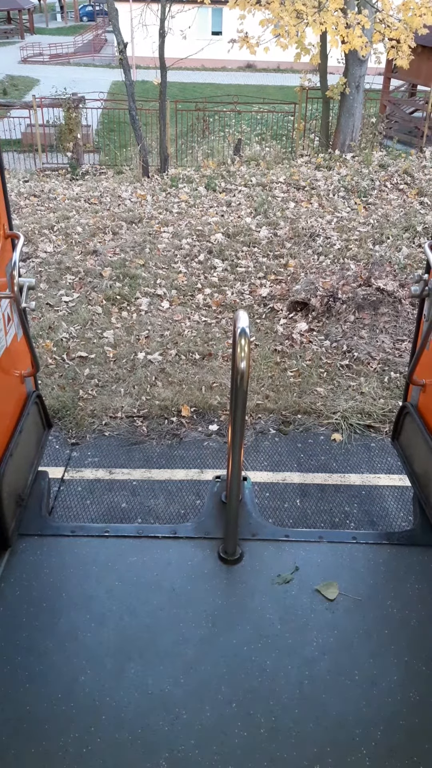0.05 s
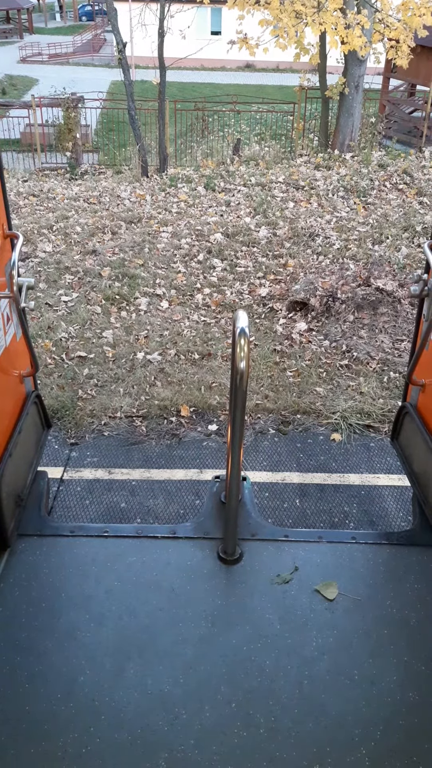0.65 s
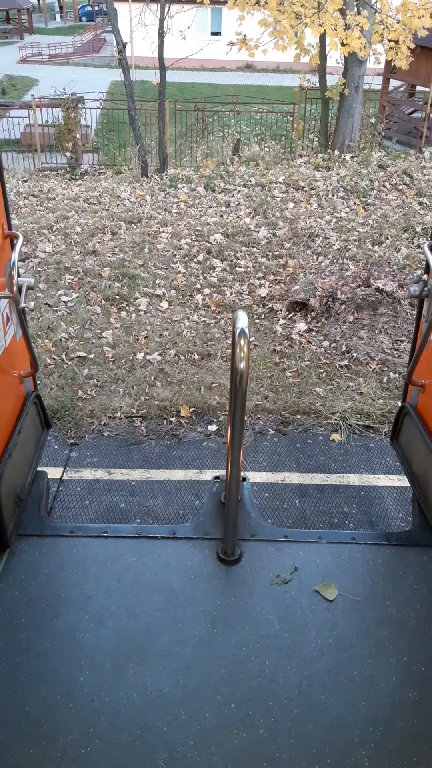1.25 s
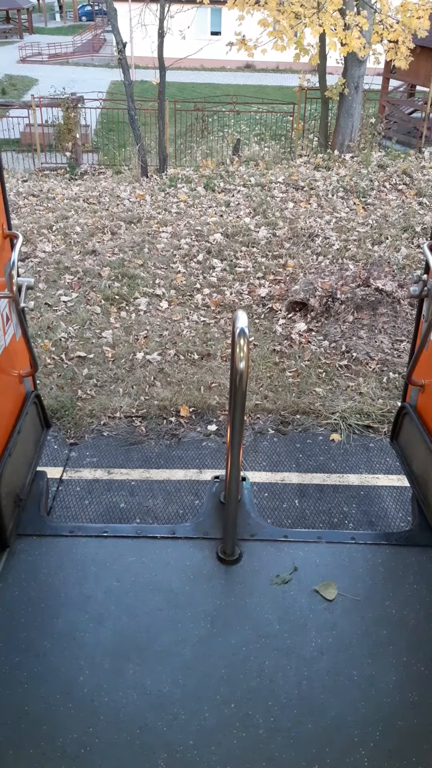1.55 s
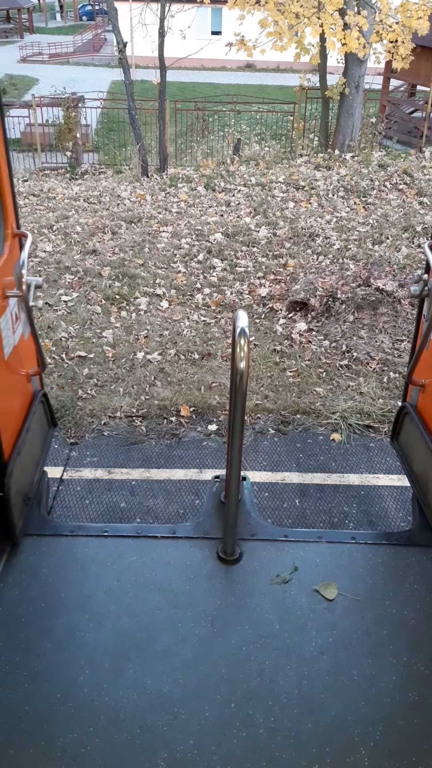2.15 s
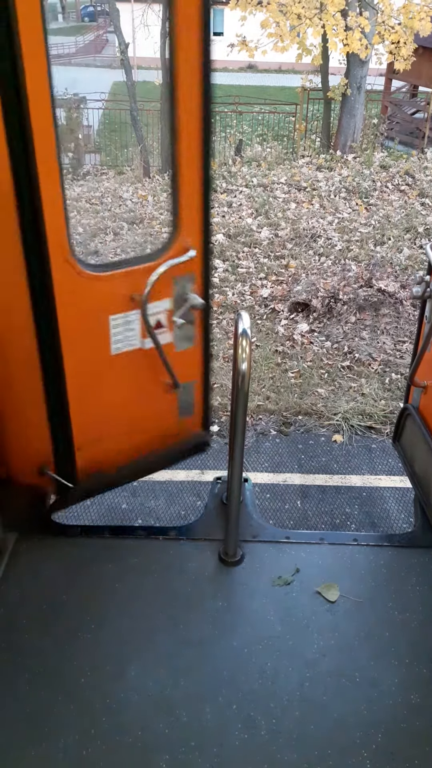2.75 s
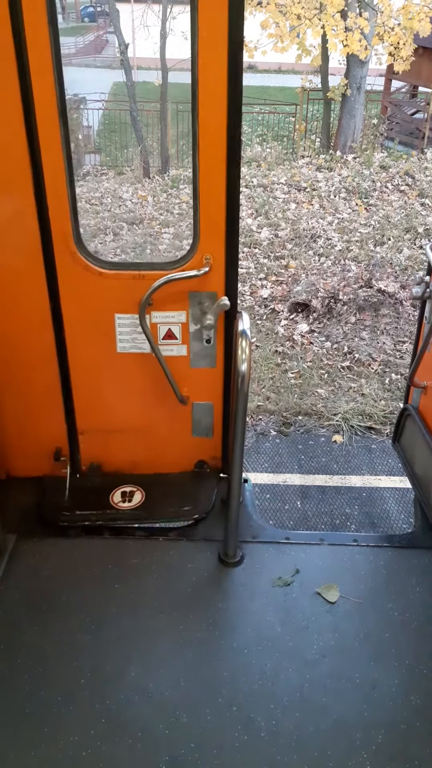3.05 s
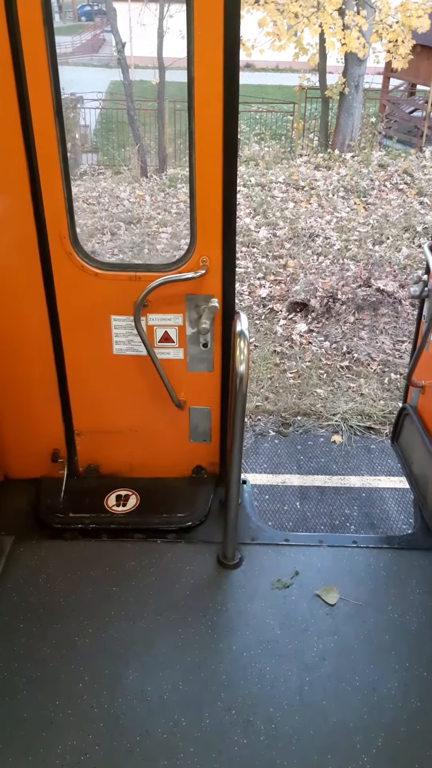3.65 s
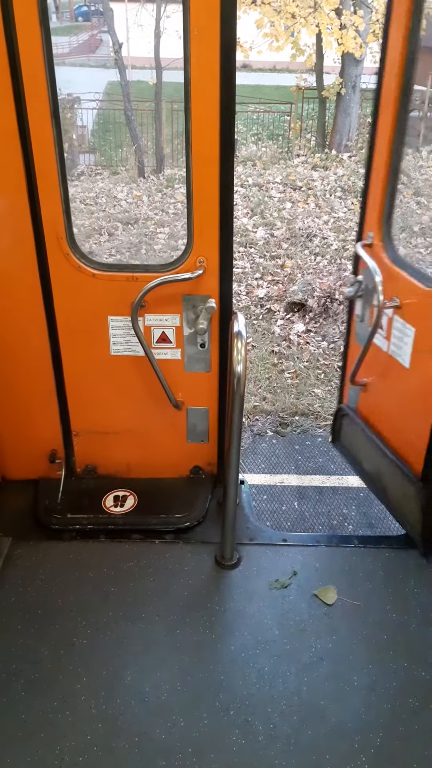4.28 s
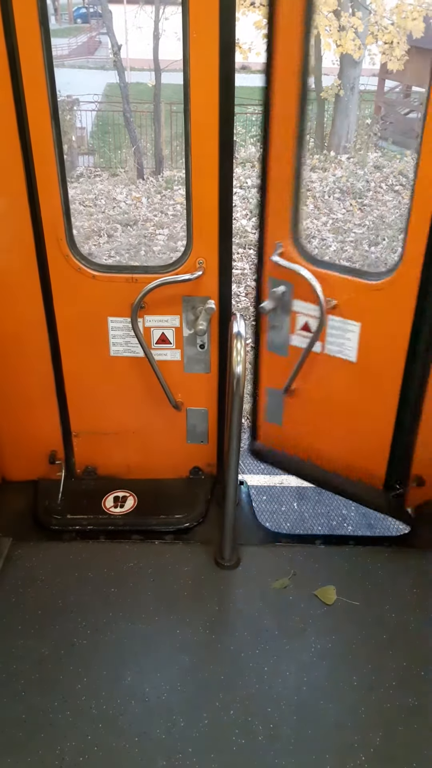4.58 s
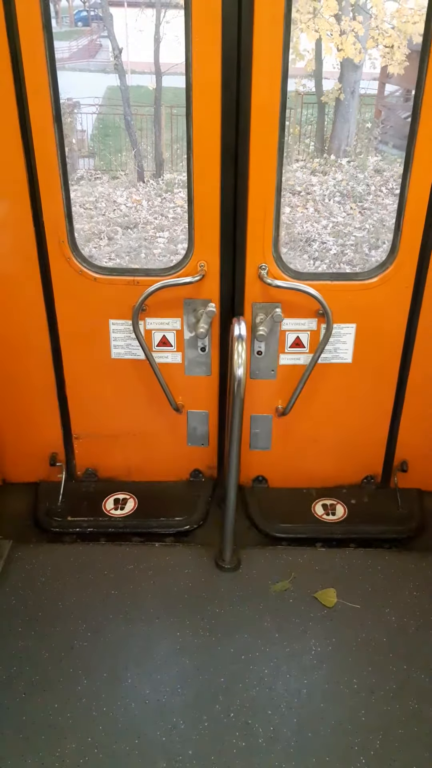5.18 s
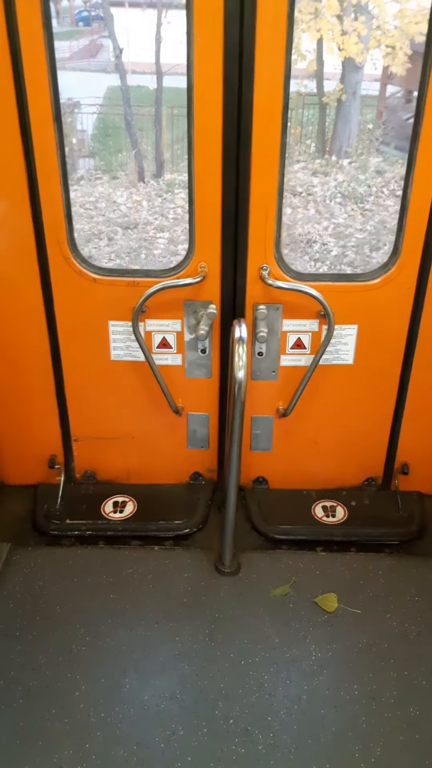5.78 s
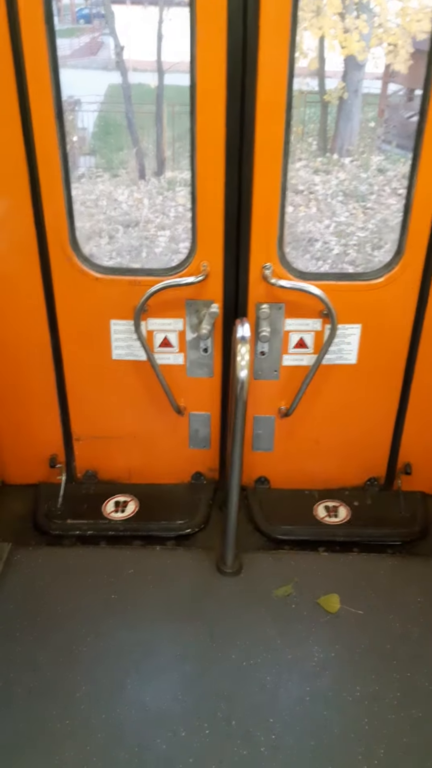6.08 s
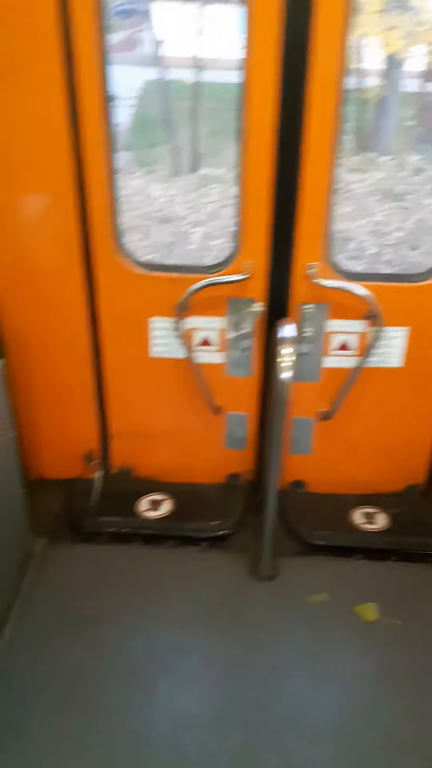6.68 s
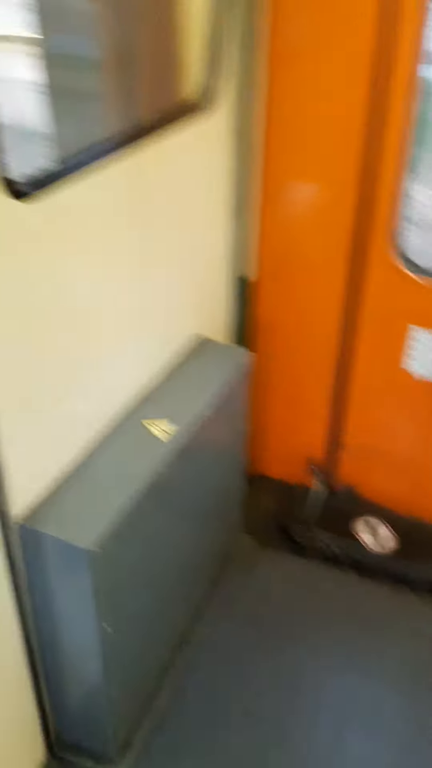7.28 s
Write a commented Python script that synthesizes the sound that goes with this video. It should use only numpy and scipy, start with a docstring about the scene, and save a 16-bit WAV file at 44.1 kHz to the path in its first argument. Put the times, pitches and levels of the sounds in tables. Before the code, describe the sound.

A standing train idles with a steady low hum and roar, heard in stereo from the vestibule near the open doors. At about 1.7 seconds a valve gives a dull thump and compressed air begins to hiss. From 2 seconds the left door rolls with a rumble, knocks and one brief squeak, the hiss surging as it slams and rattles shut around 3 seconds. The outside noise drops. From 4 seconds the right door rolls, with more hissing, knocks and short high squeaks between 4.6 and 5.3 seconds, clanking onto its metal stop near 5.2 and settling with a last knock at 5.5. The closed doors leave a muffled hum. Two small, close ticks come at 6.2 and 6.7 seconds. Around 7 seconds clothes swish and a shoe scuffs twice in one step as the cabin hum swells.

```python
"""Vestibule of a standing train, a stereo pair near the air-driven doors; idling machinery hums outside.
A valve thumps and air hisses; the left leaf rolls shut and slams, then the right one, squeaking and
clattering onto its metal stop. The shut doors muffle the hum. Close to the microphones come two small
ticks, then a swish of clothes and a scuffing step as the cabin hum swells."""
import sys
import numpy as np
from scipy import signal
from scipy.fft import rfft, irfft, next_fast_len
from scipy.io import wavfile
from scipy.ndimage import map_coordinates

SR = 44100
rng = np.random.default_rng(int(sys.argv[2]) if len(sys.argv) > 2 else 0)


def store_wav(level_fs):
    """Save 16-bit WAV to argv[1]."""
    pcm = np.round(np.clip(np.atleast_2d(level_fs), -1, 1) * 32767)
    wavfile.write(sys.argv[1], SR, pcm.T.astype(np.int16))


N = 323253
TIME = np.arange(N) / SR
VALVE_OPENS_S, RIGHT_LEAF_FROM_S = 1.712, 4

# Levels in all tables are relative.
# door cylinders, left then right: (piston seats [s], first flow [dB], sag [dB/s])
CYLINDERS = [(3.18, -25, 14), (5.52, -51.5, 2)]
# rumble of guides and floor: (frequency [Hz], density [dB])
RUMBLE = [(24, -60), (40, -17), (54, -15.5), (80, 2), (97, 0.5), (140, -12), (227, -4), (302, -11),
          (338, -7.5), (511, -16.5), (729, -31.5), (890, -28), (1200, -30), (1560, -59), (2640, -120)]


def amp(db):
    """Decibels to gain."""
    return 10 ** (np.asarray(db) / 20)


def at_hz(points, hz):
    """Reads a spectrum on a log-frequency axis."""
    f, value = np.transpose(points)
    return np.interp(np.log(hz + 1), np.log(f + 1), value)


def fader(points):
    """Gain at every sample from (time [s], level [dB]) points."""
    return amp(np.interp(TIME, *np.transpose(points)))


def fade(s, db_per_s):
    """Gain 1 until time s, then a steady decay."""
    return amp(-db_per_s * np.maximum(TIME - s, 0))


def swell(peak_s, db, rise_db_per_s, fall_db_per_s):
    """Gain that climbs to a peak and falls away, each at a steady rate in dB."""
    return amp(db - rise_db_per_s * np.maximum(peak_s - TIME, 0)) * fade(peak_s, fall_db_per_s)


def add(mix, s, sound):
    """Mixes a sound in at time s."""
    part = mix[:, round(s * SR):][:, :sound.shape[-1]]
    part += sound[..., :part.shape[1]]


def drift(n, rate_hz):
    """Smooth random wander, rms about 1."""
    knots = rng.standard_normal(int(n / SR * rate_hz) + 4)
    return map_coordinates(knots, [np.arange(n) * rate_hz / SR + 1], order=1) * np.sqrt(3 / 2)


def ring(modes, t):
    """Damped sines of a struck part."""
    return sum(amp(db - 60 * t / t60) * np.sin(2 * np.pi * hz * t) for hz, db, t60 in modes)


def diffuse(colour, n=N):
    """Coloured noise of rms 1 at the two microphones: alike in the bass, unrelated in the treble."""
    # likeness across the pair: (frequency [Hz], coherence [-1..1])
    coherence = [(50, 0.89), (270, 0.91), (550, 0.37), (900, -0.23), (1400, -0.08), (2500, -0.053)]
    size = next_fast_len(n)
    hz = np.fft.rfftfreq(size, 1 / SR)
    left, other = rfft(rng.standard_normal((2, size)))
    same = at_hz(coherence, hz)
    right = same * left + np.sqrt(1 - same ** 2) * other
    noise = irfft(np.array([left, right]) * amp(at_hz(colour, hz)), size)[:, :n]
    return noise / np.sqrt(np.mean(noise ** 2))


def cabin_tail(colour, n=30000):
    """Dense ringing of the cabin, each band dying at its own speed."""
    # reverberation: (frequency [Hz], T60 [s])
    cabin_t60 = [(80, 0.14), (250, 0.39), (700, 0.46), (2000, 0.46), (6000, 0.35), (14000, 0.23)]
    hz, t, spectra = signal.stft(diffuse(colour, n), SR, nperseg=512)
    decay = amp(-60 * t / at_hz(cabin_t60, hz)[:, None])
    return signal.istft(spectra * decay, SR, nperseg=512)[1][:, :n]


def walls(x, count=16, reach_s=0.012):
    """Early reflections from nearby walls comb the sound, differently at each microphone."""
    taps = np.zeros((2, int(0.04 * SR)))
    for channel in taps:
        delays = (reach_s * SR * rng.uniform(0.1, 1, count)).astype(int)
        channel[delays] = 0.16 * rng.choice([-1, 1], count)
    taps[:, 0] = 1
    return signal.oaconvolve(x, taps / np.linalg.norm(taps[0]), axes=1)[:, :N]


def machine_tones(lines, waver, wander_rad=0.75):
    """Tones that waver in level and phase and reach the right microphone a little late."""
    out = np.zeros((2, N))
    for hz, db in lines:
        phase = 2 * np.pi * (hz * TIME + rng.random()) + wander_rad * drift(N, 5)
        lag = np.array([[0], [min(hz / 600, 1.3)]])
        out += amp(db - 1) * np.sqrt(2) * (1 + waver * drift(N, 9.1)) * np.sin(phase - lag)
    return out


def machinery():
    """The idling train: open-air roar shut out by the doors, and hum that comes through the floor."""
    # noise outside and in the cabin: (frequency [Hz], density [dB])
    roar_colour = [(22, -30), (35, -11), (50, 1), (100, -8), (125, -11.5), (240, -10.5), (290, -0.5),
                   (380, -8.5), (600, -8), (1000, -9.5), (1150, -15.5), (1750, -15.5), (3000, -29.5),
                   (6500, -42), (8700, -55), (12000, -49)]
    hum_colour = [(30, -20.5), (50, -5.5), (100, -3), (190, -15.5), (400, -18), (520, -16.5), (600, -12.5),
                  (700, -15), (860, -11), (1050, -24), (1700, -30.5), (3000, -50), (6400, -35.5),
                  (8700, -49), (12000, -40)]
    # tones outside and in the cabin: (frequency [Hz], level [dB])
    outside_lines = [(48.4, -53), (301.5, -62), (430.7, -51.5), (581.4, -51.5), (791.3, -52),
                     (877.5, -51.5), (1023, -55), (1755, -57.5)]
    inside_lines = [(48.4, -59.5), (96.9, -51.5), (376.8, -72), (581.4, -64.5), (656.8, -70), (780.6, -64),
                    (834.4, -63), (877.5, -74), (920.5, -74.5), (1750, -80), (2060, -82)]
    # sound let in by the doorway, and the course of the cabin hum: (time [s], level [dB])
    doorway = [(0, 1), (1.7, 1), (2.9, -4.5), (3.3, -13), (4.4, -12), (5.2, -18.5), (5.7, -37.5)]
    cabin_hum = [(0, 1), (3.6, 2.5), (5.9, 2), (6.4, 0), (6.9, 2.5), (7.33, 10)]
    roar = amp(-38.5 + drift(N, 18)) * diffuse(roar_colour)
    outside = roar + machine_tones(outside_lines, waver=0.21)
    inside = amp(-53) * diffuse(hum_colour) + machine_tones(inside_lines, waver=0.14)
    return outside * fader(doorway) + inside * fader(cabin_hum)


def airflow_db(shutoff_db_per_s=70):
    """Flow from both cylinders: sags with the pressure, surges as a leaf moves, dies as its piston seats."""
    # air pushed out by a moving leaf: (peak [s], flow [dB], rise [dB/s], fall [dB/s])
    surges = [(2.93, -29, 38, 43.5), (4.8, -27, 87, 60.5), (5.17, -28, 129.5, 35)]
    power = np.zeros(N)
    for is_right, (seated_s, db, sag) in enumerate(CYLINDERS):
        venting = amp(db) * fade(VALVE_OPENS_S, sag)
        surge_power = sum(swell(*row) ** 2 for row in surges if (row[0] > RIGHT_LEAF_FROM_S) == is_right)
        power += (venting ** 2 + surge_power) * fade(seated_s, shutoff_db_per_s) ** 2
    return 10 * np.log10(power + 1e-20)


def escaping_air(knee_db=-39, saturation=0.48, rise_s=0.0026):
    """Air vents: above the knee the hiss grows more slowly and the high sizzle takes over."""
    # the two parts of the jet: (frequency [Hz], density [dB])
    hiss_colour = [(300, -8.5), (500, -3.5), (620, -6), (760, -4.5), (1100, -8), (1400, -2), (1900, -2),
                   (2600, -2.5), (3400, -2.5), (4500, -0.8), (5500, -3), (6300, 1.2), (7600, -2.5),
                   (8700, -13.5), (12000, -26)]
    sizzle_colour = [(7500, -29.5), (9000, -12), (10500, -2), (12000, 2.5), (15000, 3.5), (16000, -6)]
    flow_db = airflow_db() + 1.14 * drift(N, 60)
    valve = np.clip((TIME - VALVE_OPENS_S) / rise_s, 0, 1)
    hiss = amp(8 + flow_db - saturation * np.maximum(flow_db - knee_db, 0)) * diffuse(hiss_colour)
    sizzle = amp(5 + flow_db) * diffuse(sizzle_colour)
    return valve * (hiss + sizzle)


def piston(low_cut_hz=90):
    """Pressure kicks the piston: a short, dull judder."""
    # knocks of the judder: (time [s], level [dB])
    knocks = [(1.7125, -0.5), (1.719, -0.5), (1.7262, -1.5)]
    # valve resonances: (frequency [Hz], level [dB], T60 [s])
    modes = [(138.6, -15.5, 0.059), (231, -10, 0.039)]
    out = np.zeros((2, N))
    for s, db in knocks:
        add(out, s, -amp(db + 3) * ring(modes, TIME[:SR // 5]))
    return signal.sosfilt(signal.butter(2, low_cut_hz, "high", fs=SR, output="sos"), out)


def rollers(speed_up_s=0.57, settle_db_per_s=41.5):
    """The valve jolts the frame; the leaves tremble under pressure and rumble as they gather speed."""
    # travel of the left and right leaf: (start [s], arrival [s], full-speed rumble [dB])
    travels = [(2.16, 3.17, -29.5), (3.961, 5.1, -29)]
    jolt = amp(-24) * fade(VALVE_OPENS_S, db_per_s=139.5)
    last_seated_s = CYLINDERS[-1][0]
    tremble = amp(-48.5) * fade(last_seated_s, settle_db_per_s)
    rolling = [amp(db) * np.clip((TIME - start) / speed_up_s, 0, 1) * fade(arrival, settle_db_per_s)
               for start, arrival, db in travels]
    shaking = (TIME > VALVE_OPENS_S) * np.linalg.norm([jolt, tremble, *rolling], axis=0)
    lumps = amp(1.2 * drift(N, 45))
    return shaking * lumps * diffuse(RUMBLE)


def contact(hardness, mass):
    """Gains of thud, panel, clatter and metal edge: mass drives the thud, a hard contact the treble."""
    rubber_db, metal_db = np.array([-26.5, -29.5]), np.array([5, 7])
    clatter, edge = amp((1 - hardness) * rubber_db + hardness * metal_db)
    return mass, 1, clatter, edge


def slams(chatter_db=2.5, chatter_s=0.038, crack_s=0.0034, rise_s=0.0034):
    """Each blow rings its leaf's modes and the cabin; loose hardware chatters in the decay."""
    # blows of leaves and linkage: (time [s], level [dB], hardness [0 rubber..1 metal], mass [leaves])
    blows = [(2.064, -33.5, 0.7, 1.1), (2.128, -36.5, 0.37, 1.2), (2.469, -32, 0.078, 0.49),
             (2.632, -25.5, 0.075, .4), (2.742, -35.5, 0.22, 1), (2.828, -30.5, 0.67, .3),
             (2.867, -23.5, 0.57, 0.7), (2.924, -24, 0.94, 0.6), (2.947, -21, 0.69, 1.2),
             (2.985, -21, 0.63, 0.7), (3.010, -19, 0.52, .6), (3.056, -19, 0.64, .5),
             (3.144, -19.5, 0.73, 0.84), (3.170, -14.5, 0.52, .2), (3.221, -24.5, 0.76, 1.1),
             (4.620, -29, 0.35, 1.7), (4.658, -25, .42, .8), (4.718, -25.5, 0.61, 0.87),
             (4.730, -26.5, 0.35, 3), (4.908, -26, .4, 0.32), (4.938, -22.5, 0.35, 1.1),
             (5.085, -28.5, 0.28, 0.52), (5.132, -28, .48, 0.25), (5.170, -29, 0.8, 0.45),
             (5.187, -23, 0.79, 0.575), (5.235, -23, 0.71, .6), (5.280, -22.5, 0.94, 0.29),
             (5.323, -24.5, 0.64, 1.4), (5.500, -20, 0.53, 0.081), (5.562, -32.5, 0.61, 0.7)]
    # dense ring of leaves and frame: (frequency [Hz], density [dB])
    door_body = [(35, -14.5), (60, -3.5), (88, 1), (115, 1.5), (150, -11), (220, -4.5), (400, -6),
                 (650, -8.5), (1100, -9.5), (2000, -12), (3300, -20), (7400, -23), (8700, -36.5),
                 (15000, -31.5)]
    # resonances of each leaf: (frequency [Hz], level [dB], T60 [s])
    left_modes = [(85, -0.5, 0.26), (216.6, -2, 0.27), (327.1, -3, 0.39), (397.4, -12.5, 0.25),
                  (490, -9.5, 0.31), (985, -14.5, .3), (1437, -11, 0.26), (1543, -7.5, 0.19),
                  (1716, -15, 0.18), (1880, -13.5, 0.24), (2165, -12, 0.32), (2270, -18, .25),
                  (2770, -21.5, .33)]
    right_modes = [(84.5, -2.5, 0.25), (111, -4.5, 0.25), (220.6, -4, 0.15), (265.7, -4, 0.22),
                   (409, -7.5, 0.37), (776, -13, 0.2), (2016, -18, .28), (2130, -15.5, .28)]
    # limits of the four contact bands: (frequency [Hz])
    edges = [40, 150, 600, 3000, 15000]
    bands = [signal.butter(2, pair, "band", fs=SR, output="sos") for pair in zip(edges, edges[1:])]
    out = np.zeros((2, N))
    for s, db, hardness, mass in blows:
        body = cabin_tail(door_body)
        t = TIME[:body.shape[1]]
        chatter = amp(chatter_db * drift(len(t), 260) * np.exp(-t / chatter_s))
        crack = 1 + 0.67 * np.exp(-t / crack_s)
        leaf = left_modes if s < RIGHT_LEAF_FROM_S else right_modes
        # the point of contact decides how strongly, and with which sign, each mode answers
        weights = amp(-6 + 2 * rng.standard_normal(len(leaf))) * rng.choice([-1, 1], len(leaf))
        ringing = sum(weight * ring([mode], t) for weight, mode in zip(weights, leaf))
        blow = (body * chatter * crack + ringing) * (1 - np.exp(-t / rise_s))
        for k, (band, gain) in enumerate(zip(bands, contact(hardness, mass))):
            part = (-1) ** k * signal.sosfilt(band, blow)  # alternate signs keep adjacent bands in phase
            add(out, s, part * gain * amp(db) / part[:, :SR // 25].std())
    return out


def squeaks(overtone_db=-20, direct=0.56, wet=0.73, damping_db_per_s=80):
    """Stick-slip in the dry guides: short, rough, gliding whistles that ring on in the cabin."""
    # slips: (time [s], length [s], first pitch [Hz], last pitch [Hz], level [dB], jitter [share of pitch])
    slips = [(2.312, 0.058, 1274, 1265, -32, 0.021), (4.722, 0.016, 6100, 6290, -23, 0.034),
             (4.759, 0.025, 5880, 6650, -23.5, 0.023), (4.794, 0.048, 6340, 6060, -32.5, 0.06),
             (4.859, 0.052, 5810, 5610, -26, 0.035), (5.089, 0.012, 6900, 6080, -22, .05),
             (5.095, .045, 5870, 6750, -21, 0.028), (5.108, 0.023, 3414, 3374, -25, 0.02),
             (5.124, 0.049, 7090, 7350, -19.5, 0.01), (5.169, .035, 7330, 7210, -26.5, 0.0078)]
    out = np.zeros((2, N))
    for s, length, first_hz, last_hz, db, jitter in slips:
        n = int(length * SR)
        pitch_hz = np.linspace(first_hz, last_hz, n) * (1 + jitter * drift(n, 1400))
        phase = 2 * np.pi * np.cumsum(pitch_hz) / SR
        whistle = (np.sin(phase) + amp(overtone_db) * np.sin(2 * phase)) * signal.windows.tukey(n, 0.3)
        room = cabin_tail([(100, 0), (16000, 0)])
        room *= amp(-damping_db_per_s * TIME[:room.shape[1]])
        room *= wet * np.sqrt(2) / np.linalg.norm(room)
        room[:, 0] += direct
        heard = signal.fftconvolve(whistle[None], room, axes=1)
        add(out, s, heard * amp(db) / heard[:, :n].std())
    return out


def clank(at_s=5.177, rise_s=0.01):
    """The right leaf meets its metal stop, which rings briefly."""
    # resonances of the stop: (frequency [Hz], level [dB], T60 [s])
    modes = [(770, -19.5, 0.35), (812, -16.5, .26), (974, -12.5, 0.16), (1034, -14, 0.1), (1229, -28, .25)]
    out, t = np.zeros((2, N)), TIME[:SR // 2]
    add(out, at_s, amp(1) * ring(modes, t) * (1 - np.exp(-t / rise_s)))
    return out


def ticks(click_s=0.0039, bump_hz=185, bump_t60=0.057):
    """Two small ticks close by, each a burst of noise over a soft bump."""
    # ticks: (time [s], click [dB], bump [dB])
    events = [(6.241, -43.5, -34.5), (6.679, -42.5, -53)]
    click_colour = [(300, 7), (1600, 4), (3000, -16), (6500, -11), (9000, -30), (15000, -28)]  # (Hz, dB)
    out, t = np.zeros((2, N)), TIME[:SR // 5]
    for s, click_db, bump_db in events:
        click = amp(click_db) * diffuse(click_colour, len(t)) * np.exp(-t / click_s)
        add(out, s, click + ring([(bump_hz, bump_db, bump_t60)], t))
    return out


def scuffing_step():
    """Close by, clothes swish, then a shoe scuffs twice as the foot lands on the floor."""
    # swish and scuffs: (peak [s], level [dB], rise [dB/s], fall [dB/s])
    rubs = [(6.94, -52, 85, 72), (7.177, -38, 2000, 79), (7.224, -40, 900, 62)]
    # friction of cloth and sole: (frequency [Hz], density [dB])
    rub_colour = [(150, -40), (250, 0.5), (436, -25), (576, -24), (735, -21.5), (775, -7.5), (1330, -10),
                  (2490, -10.5), (2710, -15), (5830, -14), (8850, -27.5), (13000, -23.5), (16000, -30)]
    crinkle = amp(0.5 * drift(N, 90))
    rustle = sum(swell(*row) for row in rubs) * crinkle * diffuse(rub_colour)
    footfall = swell(peak_s=7.19, db=-40, rise_db_per_s=1200, fall_db_per_s=50) * diffuse(RUMBLE)
    return rustle + footfall


def scene():
    """Everything heard in the vestibule."""
    hum = machinery()
    doors = walls(escaping_air()) + piston() + rollers() + slams() + walls(clank()) + squeaks()
    return hum + doors + scuffing_step() + ticks()


def record(dry):
    """A stereo pair, the left microphone the brighter; peaks are rounded and the top ends at 15.9 kHz."""
    # balance of the pair: (frequency [Hz], left minus right [dB])
    balance = [(150, 1), (300, -1.5), (1300, -0.5), (3500, 2), (7000, 2), (9000, 9.5), (14000, 3.5)]
    half_db = at_hz(balance, np.fft.rfftfreq(512, 1 / SR)) / 2
    microphones = np.fft.fftshift(irfft(amp([half_db, -half_db])), axes=1)
    heard = signal.oaconvolve(dry, microphones[:, 1:], "same", axes=1)
    rounded = heard / (1 + heard ** 4) ** (1 / 4)
    low_pass = signal.firwin(511, 15900, window=("kaiser", 9), fs=SR)
    return signal.oaconvolve(rounded, low_pass[None], "same")


dry = scene()
out = record(dry)
store_wav(out)
```